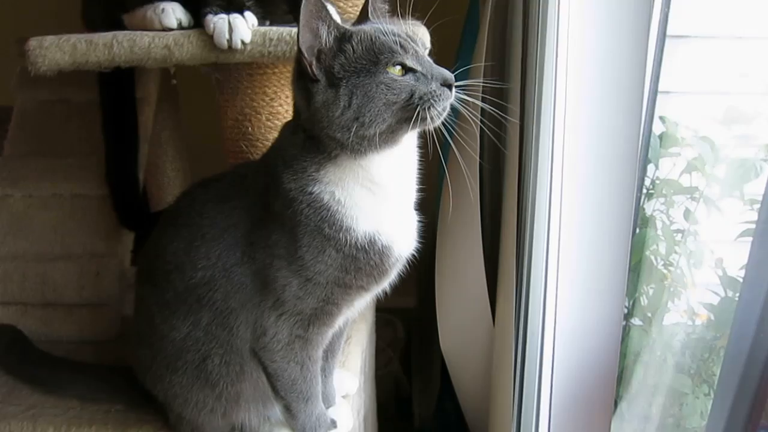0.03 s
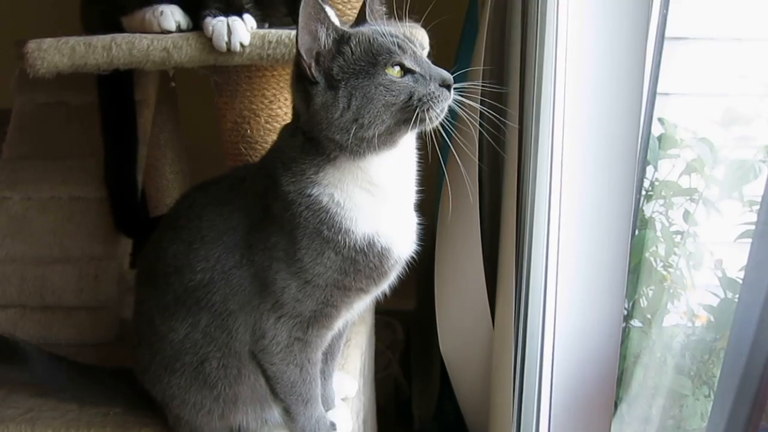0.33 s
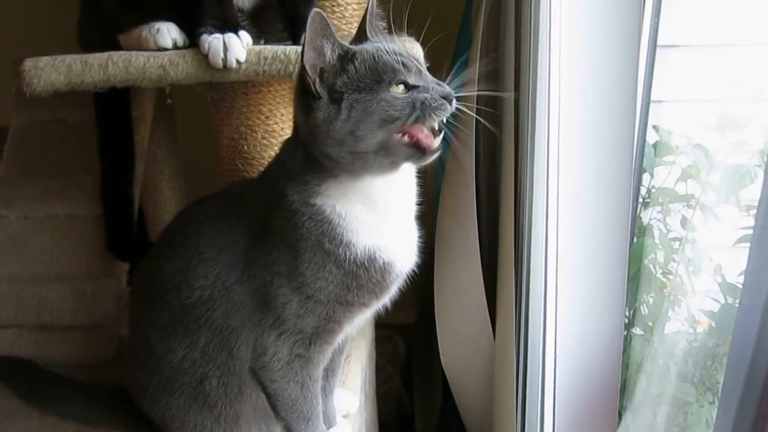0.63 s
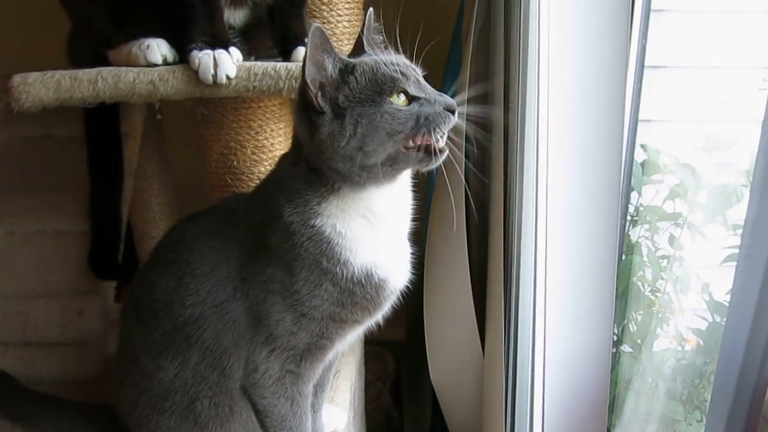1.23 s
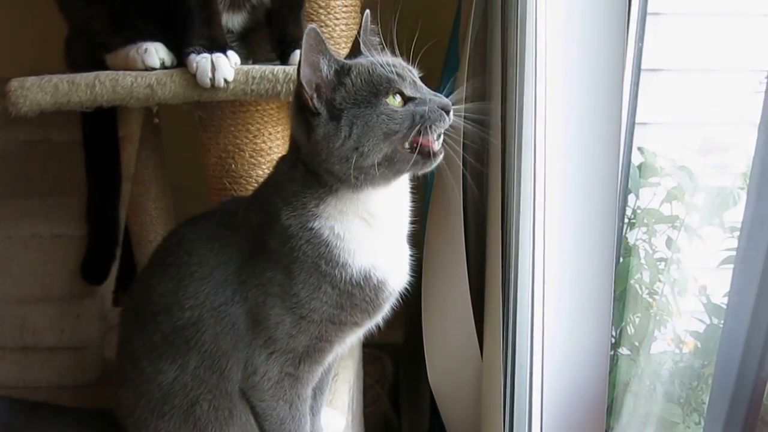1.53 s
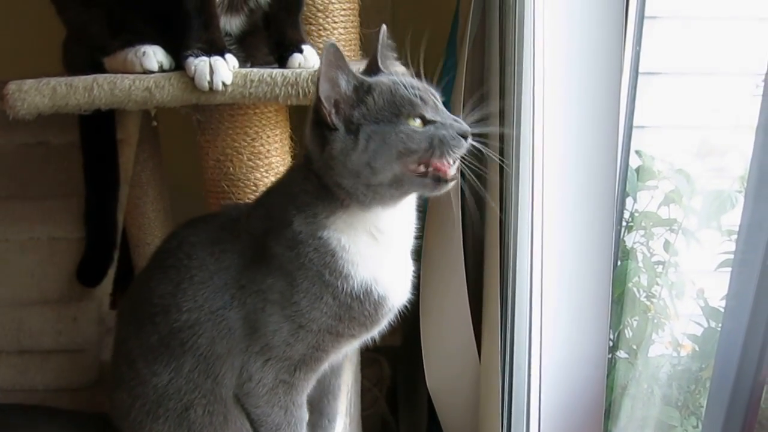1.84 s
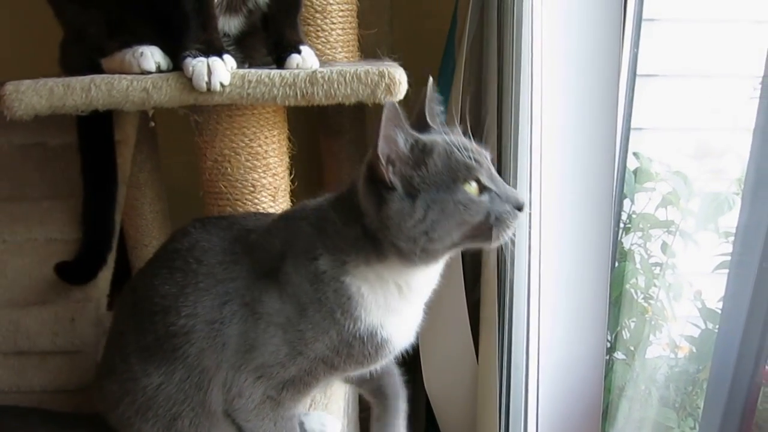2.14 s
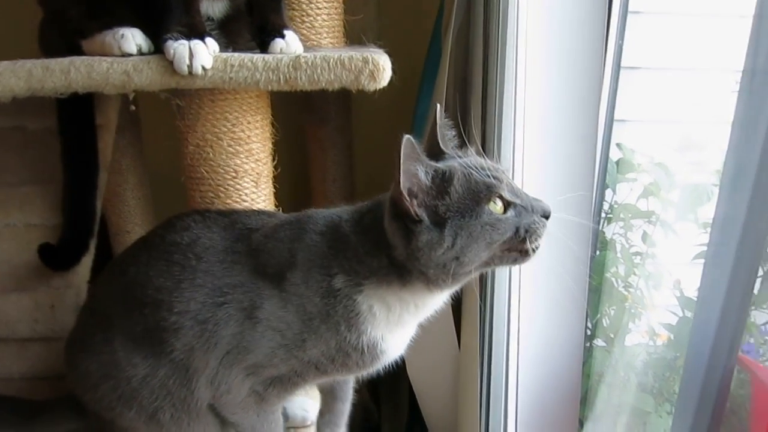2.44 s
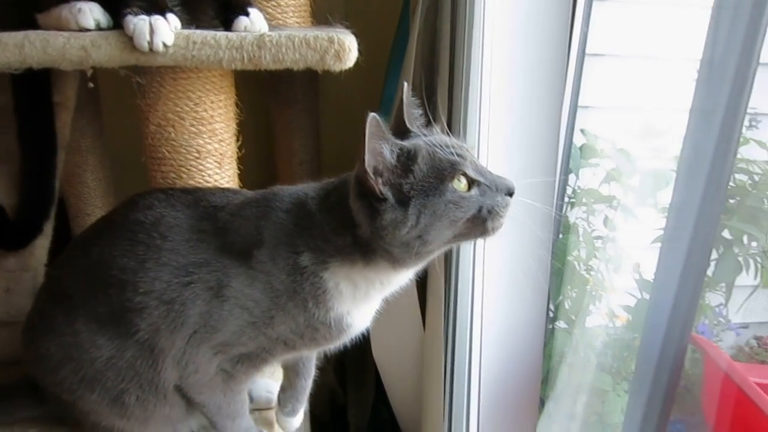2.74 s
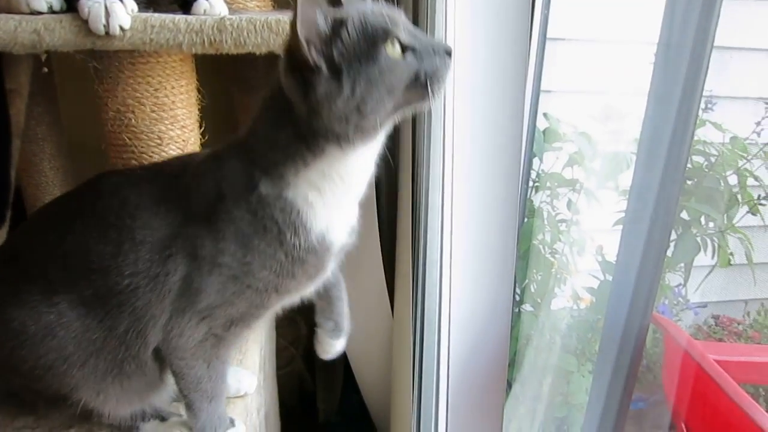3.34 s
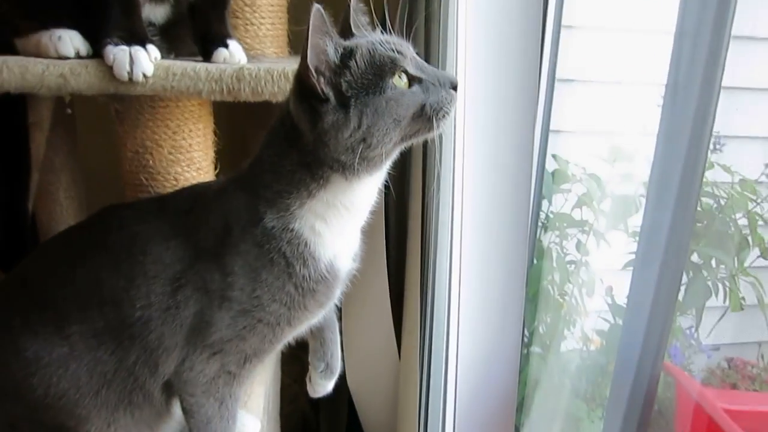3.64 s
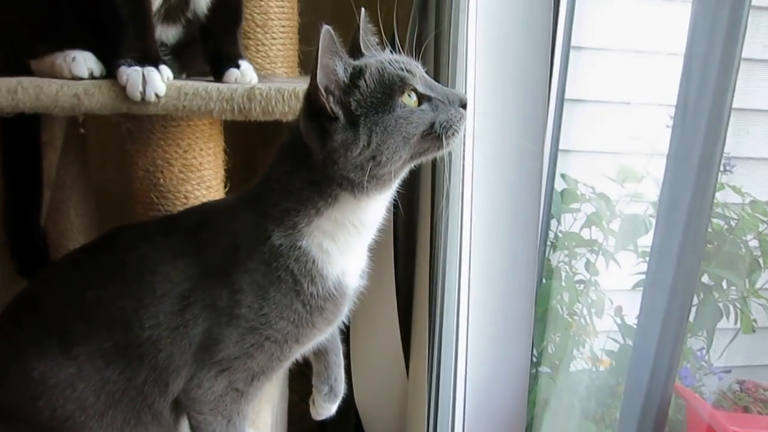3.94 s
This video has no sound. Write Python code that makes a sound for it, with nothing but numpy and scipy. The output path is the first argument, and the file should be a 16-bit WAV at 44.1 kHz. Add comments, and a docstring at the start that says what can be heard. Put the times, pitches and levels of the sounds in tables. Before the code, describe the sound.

A cat chatters in short raspy chirps over a steady fan in a quiet room.

```python
"""Cat chattering at a window

A cat chatters in a quiet room, over the rush and hum of a fan and a faint low rumble.
Each chirp is a creaky squeak of the vocal folds behind nearly shut jaws, a pop as the mouth
opens, and a short rasp of air; the pane throws back a close echo. One call is a clearer
little mew. Lips and claws tick in between, among soft rustles."""
import sys
import numpy as np
from scipy import signal
from scipy.fft import rfft, irfft, next_fast_len
from scipy.io import wavfile

SR = 44100
rng = np.random.default_rng(int(sys.argv[2]) if len(sys.argv) > 2 else 0)


def unload_wav(signal):
    """Save mono or channel-first audio to the path in sys.argv[1] as 16-bit WAV at rate SR, clipped to [-1, 1]."""
    wavfile.write(
        sys.argv[1],
        SR,
        np.round(np.clip(np.atleast_2d(signal).T, -1, 1) * 32767).astype(np.int16),
    )


N = 176400
T = np.arange(N) / SR
BIN_HZ = np.arange(N // 2 + 1) * SR / N
SIDES = np.array([[1], [-1]])   # left, right


def from_db(db):
    """Decibels to gain."""
    return 10 ** (np.asarray(db) / 20)


def unit_rms(x):
    """Scale to unit power."""
    return x / np.sqrt(np.mean(x ** 2) + 1e-20)


def at_hz(points, hz):
    """Read a table on a log-frequency axis."""
    freqs, values = np.transpose(points)
    return np.interp(np.log(hz + 1), np.log(freqs), values)


def colour(x, spectrum, extra_db=lambda hz: 0):
    """Minimum-phase filter following a dB table plus an optional curve."""
    n = x.shape[-1]
    size = 2 * next_fast_len(n)
    hz = np.arange(size // 2 + 1) * SR / size
    cepstrum = irfft(np.log(from_db(at_hz(spectrum, hz) + extra_db(hz))))
    cepstrum[1:size // 2] *= 2
    cepstrum[size // 2 + 1:] = 0
    return irfft(rfft(x, size) * np.exp(rfft(cepstrum)), size)[..., :n]


def bell(hz, centre_hz, width_hz):
    """Resonance curve, peak 1."""
    return 1 / (1 + (2 * (hz - centre_hz) / width_hz) ** 2)


def drift(rate_hz):
    """Slow random wander, unit RMS."""
    return unit_rms(irfft(rfft(rng.standard_normal(N)) / (1 + (BIN_HZ / rate_hz) ** 2), N))


def add(out, start_s, x):
    """Mix a short sound into out."""
    i = int(start_s * SR)
    out[i:i + len(x)] += x[:len(out) - i]


# Air rush spectrum. Each row: frequency in Hz, gain in dB.
FAN_SPECTRUM = [(15, -53), (25, -23), (209, -4.5), (253, -1.5), (305, -5.5), (340, -7.5), (433, -3.5),
                (469, -8.5), (552, -3.5), (762, -1), (895, -4), (1300, -3.5), (1410, -5), (1950, -8),
                (2360, -13), (3340, -26.5), (5140, -28.5), (5580, -29.5), (6380, -32.5), (10900, -36.5),
                (15500, -41)]
# Stereo width of the rush. Each row: frequency in Hz, side minus mid in dB.
FAN_WIDTH = [(60, -31), (99, -37), (160, -47), (270, -18), (450, -7.5), (740, -7), (1220, -5.5), (2010, -7),
             (3330, -4.5), (5500, -11), (9080, -3), (15000, 0.5)]
# Hum lines. Each row: frequency in Hz, level in dB, wander in Hz.
FAN_HUM = [(176.6, -59.5, 5.065), (233.3, -56, 3.2), (361.5, -54, 0.61), (420.3, -53.5, 0.55)]
def fan(rush_db=-43.5, low_cut_hz=53, early_db=3.5, early_until_s=0.495, early_fade_s=0.035):
    """Even rush of air, wider in the treble, with four wavering hum lines; a little louder at first."""
    low_cut = np.sqrt(1 + (low_cut_hz / (BIN_HZ + 1)) ** 10)
    mid, side = rfft(rng.standard_normal((2, N))) * from_db(at_hz(FAN_SPECTRUM, BIN_HZ)) / low_cut
    mid = irfft(mid, N)
    side = irfft(side * from_db(at_hz(FAN_WIDTH, BIN_HZ)), N)
    rush = (mid + side * SIDES) / mid.std()
    hum = 0
    for hz, db, wander_hz in FAN_HUM:
        waver = 1 + 0.34 * drift(2 * wander_hz)
        cycles = np.cumsum(hz + wander_hz * drift(8.37)) / SR
        hum += from_db(db) * unit_rms(waver * np.sin(2 * np.pi * cycles))
    early = np.clip(1 - (T - early_until_s) / early_fade_s, 0, 1)
    return (rush * from_db(rush_db) + hum) * from_db(early_db * early)


# Spectra of the rumble and the swell. Each row: frequency in Hz, gain in dB.
RUMBLE_SPECTRUM = [(27, -32), (42, -10), (90, 3.5), (150, 5.5), (260, -8), (500, -45)]
SWELL_SPECTRUM = [(90, -21), (180, 3), (250, 4), (310, 0.5), (450, -37.5)]
# Their envelopes. Each row: time in seconds, level in dB.
RUMBLE_LEVEL = [(.21, -52), (.265, -41), (.31, -53), (.36, -45), (.48, -59), (.53, -55.5), (1.0, -64.5),
                (1.17, -55), (1.42, -54), (1.5, -82), (4, -62)]
SWELL_LEVEL = [(1.0, -77), (1.13, -46), (1.3, -52), (1.55, -74)]
def rumble(side_db=-19.5):
    """Dull rumble, strongest early on, and one soft swell above it in pitch."""
    out = 0
    for spectrum, envelope in ((RUMBLE_SPECTRUM, RUMBLE_LEVEL), (SWELL_SPECTRUM, SWELL_LEVEL)):
        mid, side = unit_rms(colour(rng.standard_normal((2, N)), spectrum))
        level_db = np.interp(T, *np.transpose(envelope))
        out += (mid + from_db(side_db) * side * SIDES) * from_db(level_db)
    return out


# Room tail spectrum. Each row: frequency in Hz, gain in dB.
ROOM_SPECTRUM = [(200, -14.5), (1200, -0.5), (3000, 4.5), (7000, -4.5), (15000, 5.5)]
def room(x, t60_s=0.14, gap_s=0.0016, level_db=-9.5):
    """Short diffuse tail of a furnished room, different in each channel."""
    t = np.arange(SR // 3) / SR
    reflections = rng.standard_normal((2, len(t))) * from_db(-60 * t / t60_s) * (t > gap_s)
    tail = unit_rms(colour(reflections, ROOM_SPECTRUM)) / np.sqrt(len(t))
    return from_db(level_db) * signal.fftconvolve(x[None], tail, axes=1)[:, :N]


# Balance between the microphone ports. Each row: frequency in Hz, left minus right in dB.
PORT_BALANCE = [(700, 1), (1300, 0), (2400, -3.5), (4400, -1), (8100, 1.5), (15000, -1)]
# Phase between the ports. Each row: frequency in Hz, phase in radians.
PORT_PHASE = [(7000, -0.24), (9200, -1.25), (10500, -1.6), (13700, -1.4)]
def microphone_ports(x):
    """Two close ports hear the cat alike, except in level and, mostly in the top treble, phase."""
    balance = from_db(SIDES * at_hz(PORT_BALANCE, BIN_HZ) / 2)
    skew = np.tan(at_hz(PORT_PHASE, BIN_HZ) / 2)
    return irfft(rfft(x) * balance * (1 + 1j * SIDES * skew), N)


# Rustles. Each row: peak time in seconds, spread in seconds, level in dB, centre in Hz, width in Hz.
RUSTLES = [(.91, 0.023, -59, 5950, 3000), (1.35, .05, -63.5, 5940, 2500), (1.475, 0.013, -61.5, 5940, 3500),
           (3.865, 0.024, -63, 12400, 6000)]
def rustles():
    """Faint swells of bright noise."""
    out = np.zeros(N)
    for peak_s, spread_s, db, centre_hz, width_hz in RUSTLES:
        hiss = irfft(rfft(rng.standard_normal(N)) * bell(BIN_HZ, centre_hz, width_hz), N)
        swell = np.exp(-0.5 * ((T - peak_s) / spread_s) ** 2)
        out += from_db(db) * swell * unit_rms(hiss)
    return out


# Ticks. Each row: start in seconds, level in dB, resonance in Hz, width in Hz, decay in seconds.
TICKS = [(1.416, -53, 9000, 8000, .002), (1.538, -54, 3700, 1500, .003), (1.585, -56, 7000, 6000, .003),
         (1.600, -51, 6760, 1800, .005), (1.708, -52, 8500, 4000, .002), (1.792, -56, 4500, 3500, .003),
         (2.2034, -37, 3170, 250, 0.00079), (2.203, -45, 10700, 3500, 0.00084),
         (2.276, -50, 4900, 2500, .002), (2.495, -44.5, 6800, 2500, 0.0018),
         (2.526, -48, 4650, 400, 0.0043), (3.4426, -37, 9400, 1980, .0016),
         (3.9458, -33, 1670, 1000, 0.0018)]
def tick(db, hz, width_hz, decay_s):
    """Lip or claw tick: a tiny noise burst rings one resonance."""
    t = np.arange(SR // 25) / SR
    burst = rng.standard_normal(len(t)) * np.exp(-t / decay_s)
    radius = np.exp(-np.pi * width_hz / SR)
    ring = signal.lfilter([1, 0, -1], [1, -2 * radius * np.cos(2 * np.pi * hz / SR), radius ** 2], burst)
    band = signal.butter(1, [hz / 2, min(2 * hz, SR / 2 - 2000)], "band", fs=SR, output="sos")
    return from_db(db) * unit_rms(signal.sosfilt(band, ring)) * np.sqrt(decay_s / t[-1])


def larynx(pitch_hz, rough, jitter=0.16, shimmer_db=3.5):
    """Vocal fold pulses; roughness makes them uneven and adds a puff of air to each."""
    n = len(pitch_hz)
    pitch_scatter, level_scatter = rng.uniform(-1, 1, (2, n))
    cycle = np.cumsum(pitch_hz / SR).astype(int)
    phase = np.cumsum(pitch_hz * np.exp(jitter * rough * pitch_scatter[cycle]) / SR)
    pulses = np.maximum(-np.diff(phase % 1, prepend=0), 0)
    puffs = rng.standard_normal(n) * np.exp(-2.5 * (phase % 1))
    voice = np.sqrt(1 - rough) * unit_rms(pulses - pulses.mean()) + np.sqrt(rough) * unit_rms(puffs)
    return voice * from_db(shimmer_db * rough * level_scatter[phase.astype(int)])


# Course of the mew. Each row: time in seconds, pitch in Hz, level in dB, roughness from 0 to 1,
# first formant in Hz.
MEW = [(2.436, 501.6, -60, 0.76, 800), (2.443, 480, -40.5, 0.7, 800), (2.462, 453.6, -38, 0.2, 820),
       (2.474, 453.7, -41, .07, 900), (2.488, 447, -37, 0, 950), (2.497, 479, -37.5, .35, 1000),
       (2.507, 588, -40, .2, 1150), (2.52, 654, -56, 0.5, 1200)]
# Mouth response in the mew. Each row: frequency in Hz, gain in dB.
MEW_SPECTRUM = [(200, -24), (450, -6.5), (1000, -4.5), (1900, 1.5), (3100, -7), (4300, -10), (5200, -14),
                (6100, -3.5), (6700, -16), (7400, -7), (8300, -18), (13000, -29), (16000, -38)]
def mew(formant_db=10.5, formant_width_hz=300, release_s=0.006):
    """Short voiced call that clears in the middle and turns upward as the mouth widens."""
    times_s, *columns = np.transpose(MEW)
    t = times_s[0] + np.arange(SR // 8) / SR
    pitch_hz, db, rough, formant_hz = [np.interp(t, times_s, column) for column in columns]
    voice = colour(larynx(pitch_hz, rough), MEW_SPECTRUM)
    # Moving formant: shift to 0 Hz, low-pass, shift back.
    carrier = np.exp(2j * np.pi * np.cumsum(formant_hz) / SR)
    radius = np.exp(-np.pi * formant_width_hz / SR)
    ring = 2 * np.real(carrier * signal.lfilter([1 - radius], [1, -radius], voice / carrier))
    release = np.exp(-np.maximum(t - times_s[-1], 0) / release_s)
    return unit_rms(voice + (from_db(formant_db) - 1) * ring) * from_db(db) * release


def pane_echo_db(hz, delay_ms, reflection=0.48):
    """Comb response of the direct sound plus its echo off the pane."""
    return 20 * np.log10(np.abs(1 + reflection * np.exp(-2j * np.pi * hz * delay_ms / 1000)))


HISS_ATTACK_S, HISS_DECAY_S = 0.0028, 0.02
SQUEAK_ATTACK_S, SQUEAK_SWELL_DB, PITCH_SAG, SHUT_JAW_HZ = 0.006, 13, 0.22, 4300
RELEASE_S, POP_DECAY_S, POP_SPLASH = 0.006, 0.0038, 0.15
RASP_ATTACK_S, RASP_FADE_DB, RASP_RELEASE_S, RASP_FLUTTER = 0.0058, 12, 0.005, 0.43
# Spectra of a chirp's four parts. Each row: frequency in Hz, gain in dB.
HISS_SPECTRUM = [(150, -22), (900, 3.5), (1900, 6), (3200, -10.5), (4100, 0), (5200, -6.5), (7200, -7.5),
                 (8600, -20), (16000, -32)]
SQUEAK_SPECTRUM = [(150, -7), (400, -10.5), (900, -1.5), (1800, 0.5), (3200, -6), (4000, -7), (5000, -12),
                   (7200, -19), (8600, -30.5), (16000, -37)]
POP_SPECTRUM = [(150, -11.5), (400, -6), (900, 6.5), (1700, 1.5), (3000, -3.5), (4500, 1), (7000, -15.5),
                (9000, -32), (13000, -25.5), (16000, -45)]
RASP_SPECTRUM = [(150, -31), (400, -0.5), (950, 5), (1600, -6), (3000, -6.5), (5000, -9.5), (7400, -11.5),
                 (8700, -21), (11500, -25.5), (13400, -23.5), (16000, -38)]
# Chirps. Each row: start, mouth opening and rasp length in seconds, pitch in Hz, roughness from 0 to 1,
# hiss, squeak, pop and rasp levels in dB, mouth resonance in Hz, its boost in dB,
# body and treble gains in dB, pane echo delay in ms.
CHIRPS = [ (.623, 0.6572, 0.041, 345, 0.2, -30, -25, -22, -28, 2660, 13, -3, -6, 1.03),
          (0.805, 0.829, 0.026, 378.3, 0.59, -42.5, -44, -31, -34, 2750, 14, -2.5, -2, 1.05),
          (1.042, 1.077, 0.023, 351, 0.44, -43, -36, -34.5, -32, 2700, 8, -4.5, 3.5, 1.05),
          (1.223, 1.229, 0.029, 377, 0.67, -51, -44, -34, -37, 2750, 10, -7, 1, 1.09),
          (1.626, 1.663, 0.039, 387, .35, -42.5, -31.5, -30.5, -38, 2550, 10, -2, 7.5, 1.02),
          (1.82, 1.866, 0.026, 560, .25, -39, -36, -41, -30.5, 2520, 10, 3, 7, 1.01),
          (2.028, 2.066, 0.03, 620.4, .2, -44, -33, -31.5, -29.5, 2640, 13.5, -1, 8.5, 0.93),
          (2.792, 2.8059, .010, 400, 0.74, -58, -55, -34.5, -49, 2180, 12, -8, 7, 0.84),
          (2.888, 2.911, 0.014, 351.6, 0.5, -40, -36.5, -41.5, -34.5, 2120, 20.5, 8, 16.5, 0.795),
          (2.988, 3.02, 0.015, 429, 0.56, -43, -35.5, -33.5, -37, 2220, 13, -1, 17.5, 0.89),
          (3.103, 3.135, 0.025, 558.6, 0.61, -38.5, -39.5, -40.5, -41.5, 2180, 13, 2, 14, 0.89),
          (3.198, 3.227, 0.028, 723, 0.29, -40, -40.5, -52, -36, 2130, 8, 8, 7.5, 0.91)]
def chirp(start_s, opens_s, rasp_s, pitch_hz, rough, hiss_db, squeak_db, pop_db, rasp_db,
          mouth_hz, boost_db, body_db, treble_db, echo_ms):
    """Lead-in hiss and swelling squeak behind the jaws, then the mouth pops open and a rasp fades."""
    t = np.arange(SR // 6) / SR
    shut_s = opens_s - start_s
    since_open_s = np.maximum(t - shut_s, 0)
    progress = np.minimum(t / shut_s, 1)
    release = np.exp(-since_open_s / RELEASE_S)
    steady_hz = np.full(len(t), pitch_hz)

    def mouth(source, spectrum, resonance):
        """Shape a source by mouth and throat resonances and the pane echo; unit RMS."""
        def gain_db(hz):
            mouth_db = boost_db * bell(hz, mouth_hz, width_hz=620)
            throat_db = 3 * bell(hz, centre_hz=3950, width_hz=390)
            tone_db = body_db * bell(hz, centre_hz=930, width_hz=900)
            tone_db += treble_db * hz ** 2 / (hz ** 2 + 4550 ** 2)
            return resonance * (mouth_db + throat_db) + tone_db + pane_echo_db(hz, echo_ms)
        return unit_rms(colour(source, spectrum, gain_db))

    folds = larynx(pitch_hz * (1 + PITCH_SAG * (0.5 - progress)), rough)
    muffled = signal.sosfilt(signal.butter(2, SHUT_JAW_HZ, fs=SR, output="sos"), folds)
    squeak = mouth(muffled, SQUEAK_SPECTRUM, resonance=1) * np.minimum(t / SQUEAK_ATTACK_S, 1)
    squeak *= from_db(squeak_db - SQUEAK_SWELL_DB * (1 - progress)) * release

    smack = POP_SPLASH * larynx(steady_hz, rough) * np.exp(-since_open_s / POP_DECAY_S) * (t > shut_s)
    smack[int(shut_s * SR)] += 1
    pop = mouth(smack, POP_SPECTRUM, resonance=1) * from_db(pop_db) * np.sqrt(POP_DECAY_S / t[-1])

    air = rng.standard_normal(len(t)) + RASP_FLUTTER * folds
    rasp = mouth(air, RASP_SPECTRUM, resonance=0) * np.minimum(since_open_s / RASP_ATTACK_S, 1)
    rasp *= from_db(rasp_db - RASP_FADE_DB * np.minimum(since_open_s / rasp_s, 1))
    rasp *= np.exp(-np.maximum(since_open_s - rasp_s, 0) / RASP_RELEASE_S)

    hiss = mouth(larynx(steady_hz, rough=0.85), HISS_SPECTRUM, resonance=0.59) * from_db(hiss_db)
    hiss *= (1 - np.exp(-t / HISS_ATTACK_S)) * np.exp(-t / HISS_DECAY_S) * release
    return hiss + squeak + pop + rasp


def scene(onset_s=0.207, cat_low_cut_hz=160):
    """The cat in its room over fan and rumble; silent until onset_s."""
    cat = rustles()
    for row in CHIRPS:
        add(cat, row[0], chirp(*row))
    add(cat, MEW[0][0], mew())
    for start_s, *row in TICKS:
        add(cat, start_s, tick(*row))
    cat = signal.sosfilt(signal.butter(2, cat_low_cut_hz, "high", fs=SR, output="sos"), cat)
    return (microphone_ports(cat) + room(cat) + fan() + rumble()) * (T > onset_s)


def record(dry):
    """Steep low-pass at 15.9 kHz."""
    return signal.sosfilt(signal.ellip(12, 0.1, 80, 15900, fs=SR, output="sos"), dry)


dry = scene()
out = record(dry)
unload_wav(out)
```